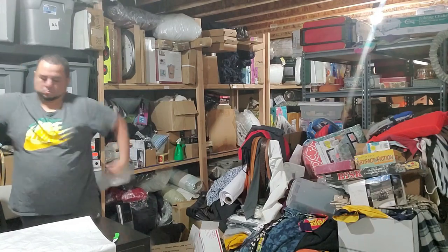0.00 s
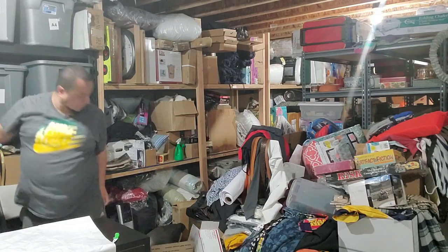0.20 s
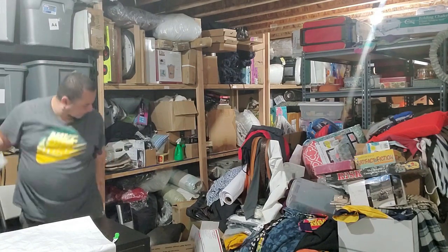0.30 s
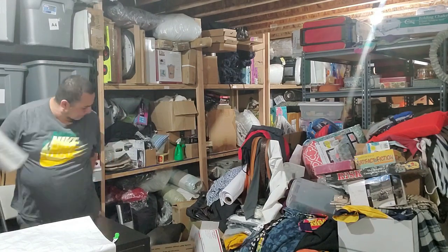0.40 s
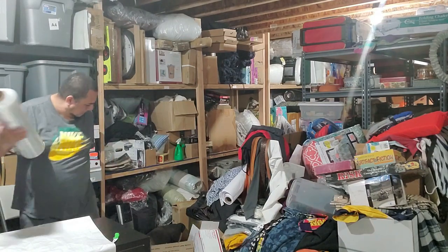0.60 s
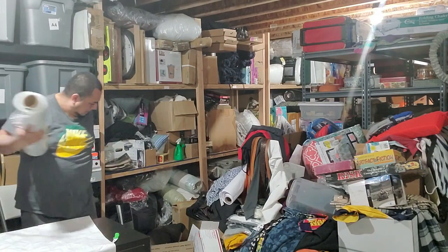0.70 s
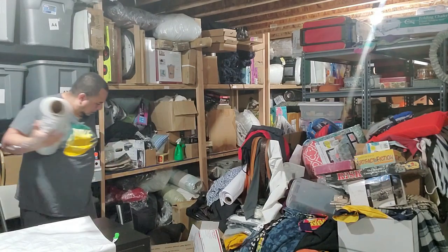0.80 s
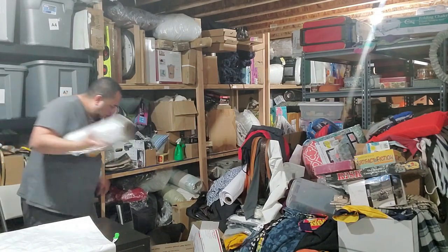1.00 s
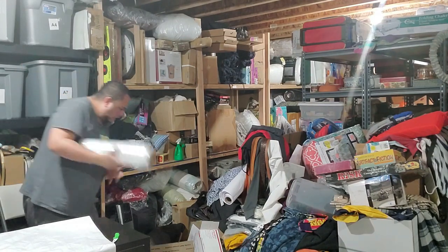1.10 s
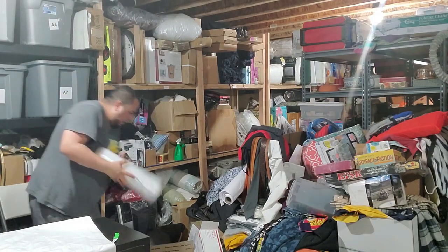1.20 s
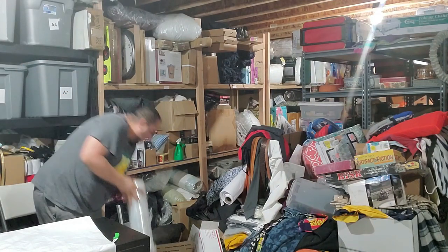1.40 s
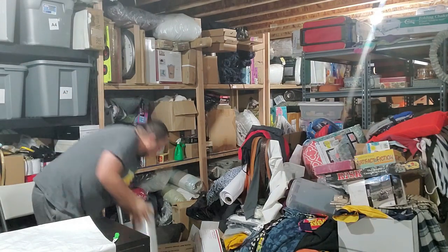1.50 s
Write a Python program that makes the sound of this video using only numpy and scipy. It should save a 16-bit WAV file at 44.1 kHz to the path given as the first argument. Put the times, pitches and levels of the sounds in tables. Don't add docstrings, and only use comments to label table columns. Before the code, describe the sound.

A glass plate shatters on a hard floor, its shards ringing, bouncing and settling indoors.

```python
import sys
import numpy as np
from scipy import signal
from scipy.fft import rfft, irfft
from scipy.io import wavfile
from scipy.ndimage import uniform_filter1d

SR = 44100
rng = np.random.default_rng(int(sys.argv[2]) if len(sys.argv) > 2 else 0)


def int16_out(signal):
    q = np.round(np.clip(np.atleast_2d(signal).T, -1, 1) * 32767)
    wavfile.write(sys.argv[1], SR, q.astype(np.int16))


def ratio(d):
    e = np.asarray(d, float) / 20
    return 10 ** e


N = 68355


def read(points, hz):
    f, value = np.transpose(points)
    return np.interp(np.log(hz + 1), np.log(f + 1), value)


def evened(x):
    return x / np.sqrt(np.mean(x ** 2) + 1e-20)


def add(mix, s, sound):
    part = mix[round(s * SR):][:len(sound)]
    part += sound[:len(part)]


def coloured(x, points):
    n = x.shape[-1]
    gain = ratio(read(points, np.fft.rfftfreq(n, 1 / SR)))
    return irfft(rfft(x) * gain, n)


def level(curve):
    s, db = np.transpose(curve)
    return ratio(np.interp(np.arange(N) / SR, s, db, left=-120, right=-120))


def smoothed(x, size):
    return uniform_filter1d(uniform_filter1d(x, size=size, axis=0), size=size, axis=0)


def hiss(points):
    # frequency in Hz, level of the differing part in dB
    apart = [(40, -13), (200, -10.5), (700, -11), (8000, -3.5), (15000, -2.5)]
    middle, side = rng.standard_normal((2, N))
    side = coloured(side, apart)
    return evened(coloured(np.array([middle + side, middle - side]), points))


def ring(hz, db, t60, seconds=.25):
    t = np.arange(0, seconds, 1 / SR)[:, None]
    fading = ratio(db - 60 * t / np.maximum(t60, .004))
    return (fading * np.sin(2 * np.pi * hz * t)).sum(1)


def hum():
    # frequency in Hz, width of the waver in Hz, level in dB
    hum_tones = [
        (379, 24, -60.5),
        (409, 54, -60),
    ]
    out = np.zeros(N)
    for hz, width, db in hum_tones:
        r = np.exp(-np.pi * width / SR)
        drift_filter = np.convolve([1, -r], [1, -r])
        slow = signal.lfilter([1], drift_filter, rng.standard_normal((2, N + 4000)))[:, 4000:]
        turning = np.exp(2j * np.pi * hz * np.arange(N) / SR)
        tone = ((slow[0] + 1j * slow[1]) * turning).real
        out += ratio(db) * evened(tone)
    return out


def room_air():
    # frequency in Hz, level in dB per Hz
    air_colour = [(25, -8), (150, 19), (600, 24), (1200, -30), (3000, -2), (16000, -26)]
    return ratio(-62.5) * hiss(air_colour)


def wrapping():
    # time in seconds, level in dB
    swish_before = [(0, -45), (.03, -51.5), (.07, -41.5), (.1, -33.5), (.125, -50), (.16, -57), (.22, -70)]
    # time in seconds, level in dB
    swish_after = [(1.3, -61), (1.4, -54), (1.55, -59)]
    # frequency in Hz, level in dB per Hz
    swish_colour = [(300, -15), (700, -1.5), (1400, 0.5), (3500, -2), (7000, -2), (12000, -6.5),
                    (16000, -1)]
    return (level(swish_before) + level(swish_after)) * hiss(swish_colour)


def rumble():
    # time in seconds, level in dB
    slide_level = [(.228, -47), (.25, -52), (.40, -45.5), (.55, -33.5), (.65, -45.5), (1.05, -52),
                   (1.55, -67.5)]
    # frequency in Hz, level in dB per Hz
    slide_colour = [(30, 14), (80, 2), (600, 4.5), (1300, -4), (3000, -18.5)]
    return level(slide_level) * hiss(slide_colour)


def shower():
    # time in seconds, level in dB
    shower_level = [(.226, -39), (.232, -27), (.33, -22), (.38, -31.5), (.465, -37), (.477, -25.5),
                    (.505, -30), (.54, -34.5), (.62, -42.5), (.68, -47), (.76, -38), (.82, -44),
                    (.865, -60.5), (.96, -47.5), (1.03, -60), (1.09, -67), (1.17, -63), (1.25, -74)]
    # frequency in Hz, level in dB per Hz
    shower_colour = [(88, -47), (150, -4.5), (1210, 6.5), (2550, -2.5), (10300, -5.5), (15600, -22),
                     (16500, -47)]
    splinters_per_s, spread_db, splinter_db, grit_db = 4000, 3, -2, 0
    lands = rng.random(N) < splinters_per_s / SR
    size = ratio(spread_db * np.minimum(rng.exponential(1, N), 4)) * lands
    kind = rng.integers(0, 60, N)
    out = np.zeros((2, N))
    for k, (pitch, length, place) in enumerate(rng.random((60, 3))):
        hz = 1800 + 14000 * pitch ** 1.2
        splinter = ring(hz, read(shower_colour, hz), 0.008 + 0.03 * length, seconds=.08)
        landings = signal.oaconvolve(size * (kind == k), splinter)[:N]
        out += landings * np.array([[1.23 + 0.2 * place], [1.3 - 0.26 * place]])
    grit = hiss(shower_colour)
    return level(shower_level) * (ratio(splinter_db) * evened(out) + ratio(grit_db) * grit)


def knock(db, hz, cycles):
    octaves, puff_db = 0.7, -1
    t = np.arange(8192) / SR
    f = np.fft.rfftfreq(len(t), 1 / SR) + 1
    near_hz = np.exp(-.5 * (np.log2(f / hz) / octaves) ** 2)
    puff = evened(irfft(rfft(rng.standard_normal(len(t))) * near_hz))
    fading = ratio(-60 * t * hz / np.maximum(cycles, 2))
    shape = fading * np.minimum(t * hz * 2, 1)
    return ratio(db) * shape * (ratio(puff_db) * puff - np.sin(2 * np.pi * hz * t))


def floor_knocks():
    # start in seconds, peak in dB, centre frequency in Hz, cycles to die away
    knock_events = [(0.238, -17, 1160, 42), (0.2557, -28.5, 262, 44), (0.273, -34, 268, 3),
                    (0.309, -26, 235, 22), (0.295, -13.5, 2470, 25), (0.2551, -22, 2930, 60),
                    (0.2559, -21.5, 2560, 63), (0.286, -33, 830, 12), (0.31, -9, 1530, 15),
                    (.322, -19.5, 1930, 20), (.33, -20.5, 1700, 29), (.3425, -14.5, 940, 9.6),
                    (.345, -11, 1770, 34.5), (0.35, -10.5, 1275, 29), (0.343, -30, 65, 4.3),
                    (0.3702, -16.5, 590, 15.4), (0.373, -17, 1330, 19.7), (0.389, -26.5, 3060, 27),
                    (.405, -21, 3600, 22), (0.431, -28, 1150, 15), (0.55, -34, 224, 4.8),
                    (0.564, -27, 229, 13.5), (0.724, -32.5, 166, 7.7), (0.737, -21, 770, 15),
                    (0.8549, -32.5, 900, 15), (.904, -24.5, 288, 4.5), (0.916, -26, 229, 3.3),
                    (.938, -46, 300, 3), (1.005, -35.5, 755, 31), (1.023, -27.5, 523, 7),
                    (1.06, -31.5, 880, 12), (1.169, -35, 270, 6.7), (1.178, -35, 1040, 10.5),
                    (1.238, -39.5, 143, 4.6), (1.264, -39.5, 720, 9.6), (1.318, -36.5, 295, 5.9),
                    (1.383, -35.5, 1240, 8.7), (1.447, -47, 150, 5.3)]
    out = np.zeros(N)
    for s, db, hz, cycles in knock_events:
        add(out, s, knock(db, hz, cycles))
    return out


def thud():
    # delay after the blow in seconds, level in dB, centre frequency in Hz, cycles to die away
    thud_bounces = [(0, -2.5, 452, 5.3), (.001, -14.5, 1500, 25), (.0045, -10, 410, 7.7),
                    (.005, -13.5, 705, 12), (.0135, -16.5, 135, 14.6), (.012, -7, 740, 4.9),
                    (.022, -27, 500, 6), (.021, -16, 700, 11), (.022, -24, 1030, 10)]
    db, hz, t60 = -11.5, 126.3, 0.088
    sharp_share, sag_s = 1, 0.0097
    t = np.arange(0, .3, 1 / SR)
    turns = np.cumsum(hz * (1 + sharp_share * np.exp(-t / sag_s))) / SR
    out = -ratio(db - 60 * t / t60) * np.sin(2 * np.pi * turns)
    for later, bounce_db, bounce_hz, cycles in thud_bounces:
        add(out, later, knock(bounce_db, bounce_hz, cycles))
    return out


def lone_rings():
    # start in seconds, level in dB, frequency in Hz, time to lose 60 dB in seconds
    ring_events = [(.2328, -17, 11670, 0.15), (.234, -19.5, 8550, 0.046), (.349, -15.5, 12100, 0.033),
                   (.404, -26, 7580, 0.028), (.4588, -24, 8110, 0.079), (0.514, -30.5, 3880, 0.19),
                   (0.579, -41, 6000, 0.2), (.633, -31.5, 2474, 0.067), (0.632, -33, 4700, 0.083),
                   (0.701, -23.5, 6100, 0.055), (0.788, -31.5, 4420, .04), (.686, -38, 3657, 0.23),
                   (.745, -34, 2263, 0.11), (.853, -50, 4146, 0.2), (.877, -42, 4110, .12),
                   (.945, -47.5, 2280, 0.33), (.945, -31, 6740, 0.067), (1.003, -38, 6830, 0.045),
                   (1.063, -31, 14000, .05), (1.076, -36, 7560, 0.056), (1.529, -43.5, 9120, 0.084),
                   (1.529, -52, 15100, 0.093)]
    out = np.zeros(N)
    for s, db, hz, t60 in ring_events:
        add(out, s, ring(hz, db, t60))
    return out


def clink(db, hz, tilt_db, t60, rise):
    cluster_db, crack_db, crack_t60, lumps_db, ring_db = -10.5, -4, 0.017, 5, -9
    pitch, softness, length = rng.random((3, 30))
    f = 2400 + 12300 * pitch ** 1.2
    tilt = tilt_db * np.log2(np.maximum(f, 4000) / 5000)
    cluster = ring(f, cluster_db + tilt - 10 * softness, t60 * (0.3 + .6 * length ** 2))
    t = np.arange(len(cluster)) / SR
    noise = rng.standard_normal(len(t))
    noise = coloured(noise, [(900, -1.5), (2500, -tilt_db), (16000, 1.39 * tilt_db + 3)])
    lumps = [(1500 * k, lumps_db * d) for k, d in enumerate(rng.standard_normal(11), 1)]
    noise = coloured(noise, lumps)
    crack = evened(noise) * ratio(crack_db - 60 * t / (crack_t60 + 0.6 * t60))
    strong = ring(hz, ring_db, 1.42 * t60)
    return ratio(db - 8.5) * np.minimum(t / rise, 1) * (cluster + crack + strong)


def clinks(events, t60, rise):
    out = np.zeros(N)
    for s, db, hz, tilt_db in events:
        add(out, s, clink(db, hz, tilt_db, t60, rise))
    return out


def settling_chips():
    # start in seconds, peak in dB, loudest ring in Hz, tilt in dB per octave
    chip_events = [(.4585, -12, 12300, 1), (.5535, -5.5, 2200, -9.5), (.685, -14.5, 1878, -6),
                   (.7367, -9, 3100, -7.5), (.6575, -41, 9800, 8), (.778, -42, 10600, -2),
                   (1.0412, -30, 4240, -13), (1.0995, -18.5, 3350, -5.5), (1.134, -35, 2560, -20),
                   (1.1421, -19.5, 5800, -5.5), (1.16, -42, 6900, -3), (1.196, -41.5, 3860, -12),
                   (1.2272, -32, 4190, -7.5), (1.244, -44, 10800, -9), (1.2525, -34.5, 3200, -12),
                   (1.29, -44, 8000, 4), (1.3015, -31.5, 3950, 1.5), (1.33, -47, 4470, -3),
                   (1.3465, -43.5, 4360, -2), (1.362, -38, 9800, 4.5), (1.5284, -33.5, 9120, 1)]
    return clinks(chip_events, t60=0.047, rise=0.0013)


def skidding_shards():
    # start in seconds, peak in dB, loudest ring in Hz, tilt in dB per octave
    skid_events = [(0.6123, -19.5, 4140, -6.5), (0.763, -22.5, 6200, -6), (0.7877, -22, 4600, -3),
                   (0.8718, -23.5, 6600, 0), (0.8784, -27, 4080, 1), (0.9093, -25, 7880, -1),
                   (0.9947, -26, 5360, -0.5), (1.075, -17, 4510, -3), (1.4716, -34, 5480, -3.5),
                   (1.498, -35, 4640, -6.5)]
    return clinks(skid_events, t60=0.089, rise=0.0023)


def bouncing_shards():
    # start in seconds, peak in dB, loudest ring in Hz, tilt in dB per octave
    shard_events = [(.471, -9.5, 5610, -7), (.476, -12.5, 5630, 0), (.483, -14.5, 11400, 7),
                    (.496, -13, 5500, -4), (.5115, -15.5, 6880, 0), (.592, -23.5, 3820, -3.5),
                    (.6325, -16.5, 10480, -3), (.681, -14, 7200, -7), (.8139, -25.5, 2920, -5.5),
                    (.9425, -20.5, 4930, -3), (1.0605, -16, 9960, -3.5)]
    return clinks(shard_events, t60=0.11, rise=0.00099)


def breaking_cracks():
    # start in seconds, peak in dB, loudest ring in Hz, tilt in dB per octave
    crack_events = [(.228, -7.5, 6370, -6.5), (.233, -9, 12200, 4.5), (.255, -3.5, 3030, -16),
                    (.264, -4.5, 6370, 5), (.277, -10.5, 3400, 7), (.294, -1.5, 2440, 0),
                    (.308, -4, 8840, 5), (.320, -3.5, 10140, -1.5), (.332, -8, 6200, -2.5),
                    (.348, -10, 3920, -0.5), (.387, -10.5, 5270, 2.5), (.404, -11.5, 7670, 1.5)]
    return clinks(crack_events, t60=0.07, rise=0.0013)


def plate(blow_db):
    # frequency in Hz, level in dB
    plate_tones = [(3517, -13.5), (5152, -5), (5744, -14), (6366, -10), (6968, -14), (7622, -30),
                   (8332, -11.5), (8469, -26), (8985, -11), (9591, -13), (10070, -12), (10982, -6),
                   (12100, -12), (13368, -11)]
    flutter_db, t60_at_5000_hz, dulling = 4.5, 0.41, 0.49
    hz, db = np.transpose(plate_tones)
    flicker = evened(smoothed(rng.standard_normal((SR // 2, len(hz))), 300))
    t60 = t60_at_5000_hz * (5000 / hz) ** dulling
    return ring(hz, db + blow_db + flutter_db * flicker, t60, seconds=.5)


def ringing_plate():
    # start in seconds, level in dB
    plate_blows = [
        (.2548, -14.5),
        (.2942, -32.5),
        (0.31, -29.5),
        (0.3483, -25.5),
    ]
    out = np.zeros(N)
    for s, blow_db in plate_blows:
        add(out, s, plate(blow_db))
    return out


def glass():
    out = floor_knocks() + lone_rings() + settling_chips() + skidding_shards()
    out += bouncing_shards() + breaking_cracks() + ringing_plate()
    add(out, .4702, thud())
    return out


def room(x):
    # frequency in Hz, time to lose 60 dB in seconds
    echo_t60 = [(100, 0.096), (1000, 0.057), (5000, 0.11), (15000, 0.062)]
    at = np.arange(120, 16000, 20) + rng.integers(0, 20, (2, 794))
    echoes = np.zeros((2, 16384))
    np.put_along_axis(echoes, at, rng.choice([-1., 1.], at.shape), 1)
    hz, t, z = signal.stft(echoes, SR, nperseg=256)
    fading = ratio(-60 * t / read(echo_t60, hz)[:, None])
    tail = signal.istft(z * fading, SR, nperseg=256)[1]
    tail = tail / np.linalg.norm(tail[0])
    return ratio(-14) * signal.fftconvolve(x[None], tail, axes=1)[:, :N]


def widened(x):
    # frequency in Hz, level of the left-right difference in dB
    side_level = [(100, -23), (500, -15), (4000, -14), (13000, -6.5)]
    smear = rng.standard_normal(200) * ratio(-np.arange(200) * .1)
    smeared = np.convolve(x, smear / np.linalg.norm(smear))[:N]
    place = evened(smoothed(rng.standard_normal(N), 600))
    side = place * coloured(smeared, side_level)
    return np.array([x + side, x - side])


def scene():
    background = hum() + room_air() + wrapping() + rumble()
    hits = glass()
    return background + shower() + room(hits) + widened(hits)


def top_cut(x):
    return signal.sosfilt(signal.butter(12, 17010, fs=SR, output="sos"), x)


def record(dry):
    # frequency in Hz, microphone gain in dB
    mic_colour = [(25, -17), (70, -1), (10000, 1), (14000, -1.5), (16000, -9)]
    limited = np.tanh(coloured(dry, mic_colour) / 0.98) * 1.205
    low_pass = signal.firwin(255, 15950, fs=SR)
    edged = signal.oaconvolve(limited, low_pass[None], "same")
    return top_cut(edged)


dry = scene()
out = record(dry)
int16_out(out)
```